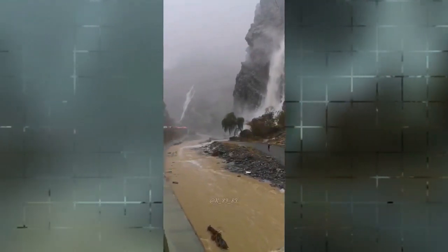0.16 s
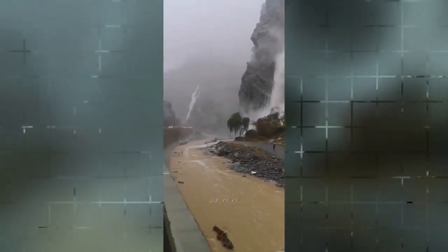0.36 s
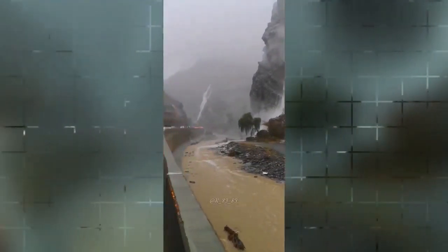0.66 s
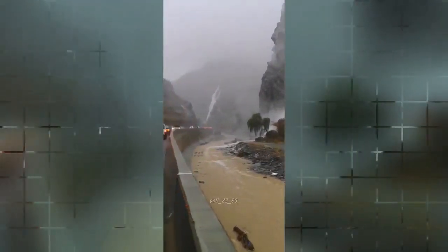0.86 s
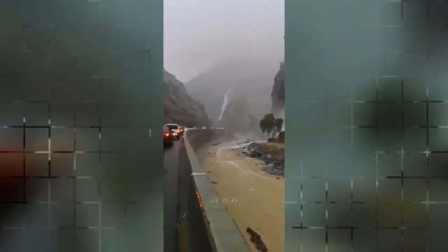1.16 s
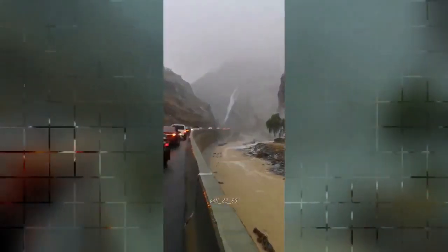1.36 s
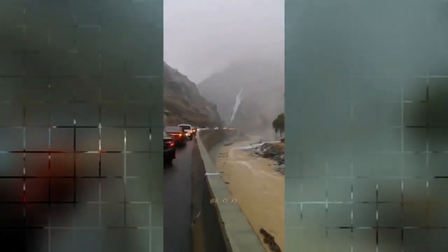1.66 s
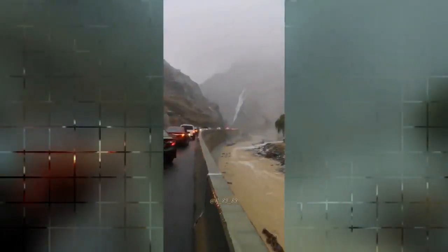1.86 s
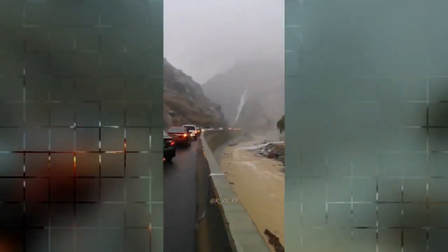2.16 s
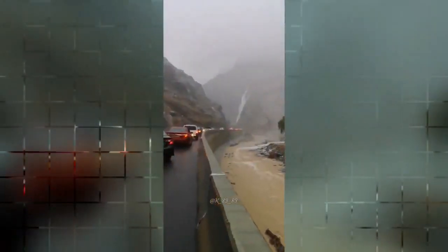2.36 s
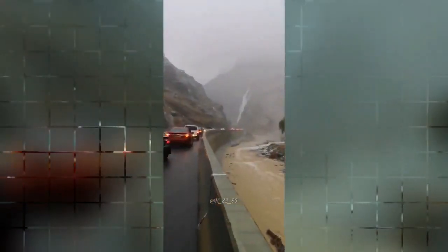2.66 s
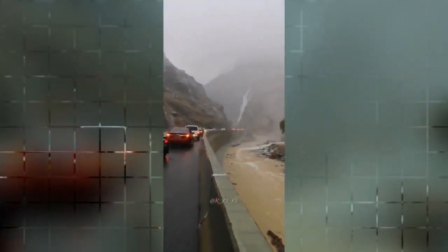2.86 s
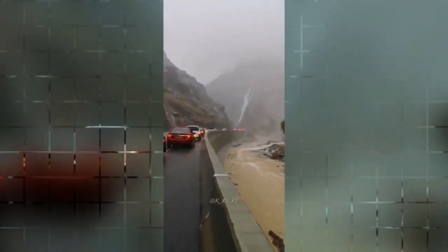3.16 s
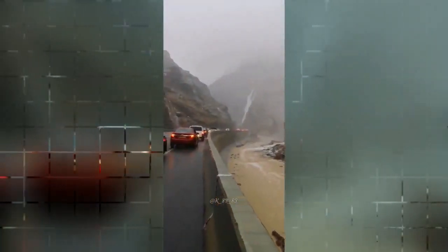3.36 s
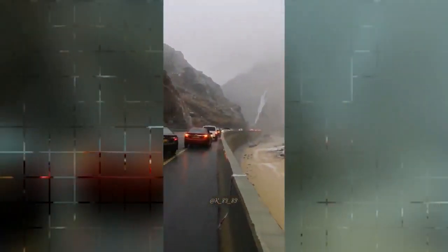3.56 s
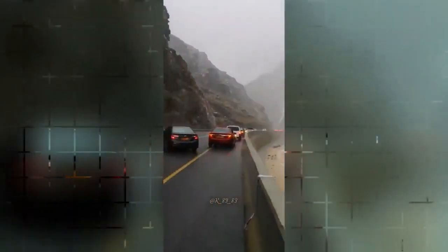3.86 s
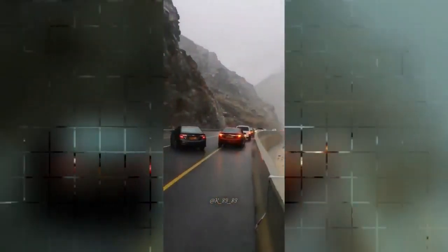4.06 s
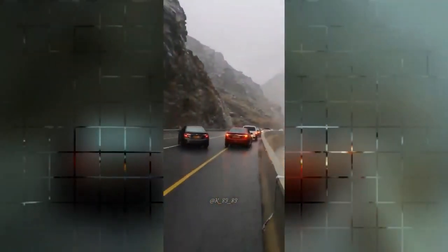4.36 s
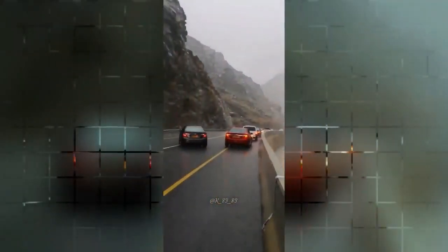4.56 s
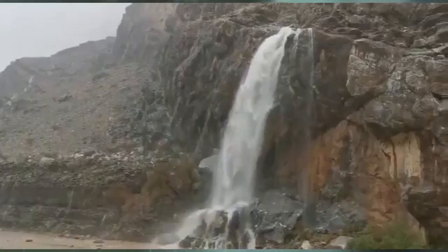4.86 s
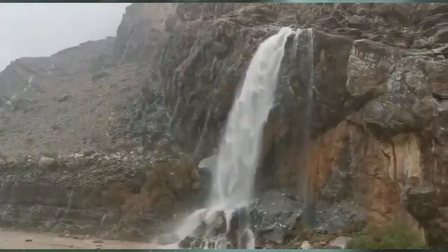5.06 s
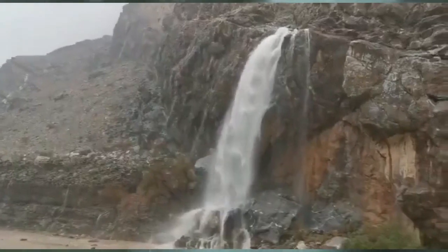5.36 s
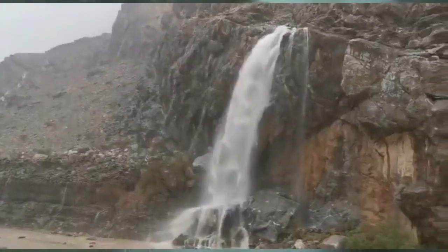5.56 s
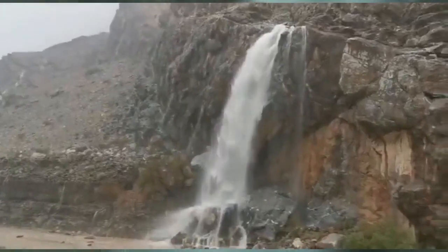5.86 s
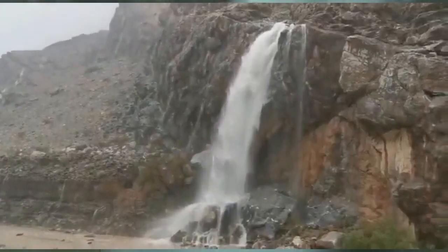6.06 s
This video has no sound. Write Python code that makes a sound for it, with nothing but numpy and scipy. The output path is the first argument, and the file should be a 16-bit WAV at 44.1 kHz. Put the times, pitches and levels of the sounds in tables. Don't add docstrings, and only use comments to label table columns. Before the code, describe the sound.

Heavy rain hisses over a mountain road beside a rumbling flood, with wind buffeting and hard drop slaps, then silence and a waterfall's roar.

```python
import sys
import numpy as np
from scipy import signal
from scipy.fft import rfft, irfft
from scipy.io import wavfile
from scipy.ndimage import uniform_filter1d

SR = 44100
rng = np.random.default_rng(int(sys.argv[2]) if len(sys.argv) > 2 else 0)


def generate_wav(sig):
    pcm = np.round(np.clip(np.atleast_2d(sig).T, -1, 1) * 32767).astype(np.int16)
    wavfile.write(sys.argv[1], SR, pcm)


def volts(x):
    e = np.asarray(x, float) / 20
    return 10 ** e


N = 273720
FRAME_START = 208
TOP_HZ = 16050


def rms_one(x):
    return x / np.sqrt(np.mean(x ** 2) + 1e-20)


def in_time(rows):
    s, *columns = np.transpose(rows)
    return [np.interp(np.arange(N) / SR, s, c) for c in columns]


def at_hz(points, hz):
    table_hz, value = np.array(points)[:, 0], np.array(points)[:, 1]
    return np.interp(np.log(hz), np.log(table_hz), value)


def follow(level_db, share, curve_db):
    return level_db + share * (curve_db - curve_db.mean())


def drift(rate):
    r = np.exp(-80 * np.pi * rate / SR)
    noise = rng.standard_normal(N // 40 + 2002)
    slow = signal.lfilter([1], [1, -2 * r, r * r], noise)[2000:]
    return np.interp(np.arange(N) / 40, np.arange(len(slow)), rms_one(slow))


def ring(clicks, hz, t60):
    r, w = volts(-60 / (t60 * SR)), 2 * np.pi * hz / SR
    return signal.lfilter([0, np.sin(w)], [1, -2 * r * np.cos(w), r * r], clicks + 1e-18)


def burst(hz, t60, size=2048):
    swing = ring(ring(np.eye(1, size)[0], hz, t60), hz, t60)
    return swing / np.abs(swing).max()


def grains(per_s, spread_db):
    sizes = volts(spread_db * np.minimum(rng.exponential(1, (2, N)), 5)) * rng.choice([-1, 1], (2, N))
    return rms_one(sizes * (rng.random((2, N)) < per_s / SR))


def bands(source, colour, low_hz, high_hz, patchy_db, rate, stereo=True):
    # frequency in Hz, left-right correlation.
    likeness = [(25, 0.99), (60, 1), (130, 0.98), (260, 0.94), (400, 0.34), (700, 0.004), (1250, 0.43),
                (1750, 0.42), (2400, -0.51), (3400, 0.2), (6000, 0.093), (8000, 0.29), (9300, 0.58),
                (12000, 0.14)]
    # frequency in Hz, left minus right in dB.
    ports = [(300, 0), (700, -2), (1100, -0.4), (1800, -2.5), (2600, 3), (3400, 0.2), (5200, 3),
             (6100, 4.5), (7750, 10), (8700, 6.5), (9800, 1)]
    hz = np.maximum(np.fft.rfftfreq(N, 1 / SR), 1)
    mid, side = rfft(source) * volts(at_hz(colour, hz))
    alike = np.clip(at_hz(likeness, hz), -1, 1) if stereo else 1
    tilt = volts(at_hz(ports, hz) / 2 * np.array([[1], [-1]])) if stereo else 1
    pair = tilt * (np.sqrt(1 + alike) * mid + np.sqrt(1 - alike) * side * [[1], [-1]])
    out, together = 0, drift(rate / 4)
    for centre in np.arange(np.log2(low_hz), np.log2(high_hz), .5):
        window = np.cos(np.pi * np.clip(np.log2(hz) - centre, -.5, .5))
        flicker = volts(patchy_db * (0.29 * together + drift(rate)))
        out = out + flicker * irfft(pair * window, N)
    return out / np.sqrt(np.mean(out.mean(axis=0) ** 2))


def evened(x, share):
    even_s = 0.047
    level = np.sqrt(uniform_filter1d(x.mean(axis=0) ** 2, int(even_s * SR)) + 0.024)
    return rms_one(x / level ** np.clip(share, 0, 1))


def gusty(wind_db, gusts, length_s):
    t = np.arange(N) / SR
    gust_power = sum(volts(2 * db) * np.exp(-((t - s) / length_s) ** 2) for s, db in gusts)
    return 10 * np.log10(volts(2 * wind_db) + gust_power)


def gulps():
    # start in seconds, level in dB, pitch in Hz.
    bubbles = [
        (5.191, -25, 330),
        (5.398, -24, 250),
        (5.751, -24, 206),
        (5.83, -24.5, 322),
    ]
    out = np.zeros(N)
    for s, level_db, hz in bubbles:
        start = round(s * SR)
        out[start:start + 4096] += volts(level_db) * burst(hz, 5.5 / hz, size=4096)
    return out


def waterfall():
    # frequency in Hz, density in dB per Hz.
    fall_colour = [(12, -11), (30, 3), (98, -2.5), (240, -9), (420, -21), (620, -18), (1240, -25),
                   (1850, -20.5), (2180, -18.5), (2450, -19), (2750, -25), (3500, -23), (4400, -24),
                   (5200, -22), (7000, -27), (7850, -37.5), (9000, -28.5), (10900, -24), (13400, -33.5)]
    # time in seconds, wind in dB, plunge in dB.
    fall_levels = [(5.12, -28.5, -38.5), (5.24, -29.5, -39), (5.33, -30.5, -39), (5.5, -23, -38),
                   (5.64, -29, -40), (5.8, -30.5, -38.5), (6.07, -31, -37), (6.2, -35.5, -35.5)]
    # time in seconds, peak in dB.
    fall_gusts = [(5.13, -27.5), (5.2, -27), (5.3, -23.5), (5.336, -29), (5.44, -27), (5.51, -38),
                  (5.58, -40), (5.65, -25.5), (5.76, -27.5), (5.83, -26), (5.89, -34), (6.01, -34),
                  (6.17, -31)]
    lull_db, gust_s = -8, 0.009
    pool_db, mist_mean_db, churn_db = -43.5, -44.5, -33.5

    wind_db, spray_db = in_time(fall_levels)
    plunge = spray_db - spray_db[-SR:].mean()
    gust = wind_db - wind_db[-SR:].mean()
    roar_db = pool_db + 0.73 * plunge + 0.25 * gust
    mist_db = mist_mean_db + 0.73 * plunge
    water = rng.standard_normal((2, N)) + 0.39 * grains(per_s=900, spread_db=2.0)

    def part(low_hz, high_hz, patchy_db, rate):
        return bands(water, fall_colour, low_hz, high_hz, patchy_db, rate, stereo=False)

    gust_db = gusty(wind_db + lull_db, fall_gusts, gust_s)
    wind = volts(gust_db) * evened(part(16.1, 100, patchy_db=3.0, rate=20.0), .6)
    churn = evened(part(127.0, 370, patchy_db=3.5, rate=20.0), .3)
    wind = wind + volts(churn_db + gust + 0.27 * (gust_db - wind_db)) * churn
    roar = volts(roar_db) * part(466, 1100, patchy_db=3.0, rate=12.0)
    spray = volts(spray_db) * part(1235, 6000, patchy_db=1.35, rate=11.0)
    mist = volts(mist_db) * part(6720, 17000, patchy_db=1.5, rate=5.4)
    return (wind + roar + spray + mist)[0] + gulps()


def rumble():
    # frequency in Hz, density in dB per Hz.
    rumble_colour = [(8.8, -54), (15, -11), (46, 1), (64, -2.5), (110, -7.5), (150, -11.5), (232, -19.5),
                     (269, -23), (409, -30.5), (480, -46.5), (620, -75.5), (1060, -120)]
    # time in seconds, level in dB.
    mean_wind = [(0.0, -27.5), (0.38, -30.5), (0.6, -26), (1.5, -21), (2.0, -22), (2.5, -27.5), (3.3, -32),
                 (3.95, -32), (4.3, -34), (4.7, -35.5)]
    # time in seconds, peak in dB.
    road_gusts = [(0.0, -24.5), (.08, -22), (0.482, -13), (.58, -14), (.78, -26), (1.08, -14.5),
                  (1.3, -20.5), (1.55, -15), (1.68, -16), (1.96, -9.5), (2.019, -15), (2.13, -24),
                  (2.28, -23), (2.62, -30), (2.97, -28), (3.15, -25.5), (3.489, -17), (3.88, -27),
                  (4.12, -20.5), (4.24, -23.5)]
    # time in seconds, level in dB.
    surge = [(0.0, -30), (0.05, -29.5), (0.29, -31.5), (0.54, -28.5), (0.73, -30.5), (1.39, -29.5),
             (1.71, -30.5), (1.98, -27.5), (2.13, -33.5), (2.16, -31), (3.36, -35), (3.49, -29),
             (3.53, -38), (3.76, -34), (3.82, -31.5), (4.03, -36), (4.58, -34), (4.7, -34)]
    roar_db, roar_gusts = 3, 0.11

    (wind_db,), (flood_db,) = in_time(mean_wind), in_time(surge)
    gust_db = gusty(wind_db, road_gusts, length_s=0.015)
    air = rng.standard_normal((2, N))
    lumps = evened(bands(air, rumble_colour, 16, 75, patchy_db=-0.3, rate=39.0), 0.6)
    roar = evened(bands(air, rumble_colour, 93.7, 380, patchy_db=-1.84, rate=11.0), 0.19)
    return volts(gust_db) * lumps + volts(roar_db + flood_db + roar_gusts * (gust_db - wind_db)) * roar


def rain():
    # time in seconds, level in dB.
    downpour = [(0.0, -39.5), (1.13, -40), (1.6, -41.5), (2.39, -40), (2.9, -40), (3.1, -39), (3.48, -40),
                (4.4, -38.5)]
    # frequency in Hz, density in dB per Hz.
    rain_colour = [(260, -30), (450, -1.5), (537, -7), (848, -5.5), (1000, -4), (1200, -4.5), (1640, -3),
                   (2140, -1.5), (2750, -4), (3290, -9), (4500, -11), (5200, -11.5), (6190, -10.5),
                   (7200, -11.5), (7830, -8), (10100, -17.5), (11800, -17.5), (14300, -22.5), (15200, -19)]
    patter_db, = in_time(downpour)
    sizzle_db = follow(-38.5, 1.2, patter_db)
    fall = rng.standard_normal((2, N)) + .45 * grains(per_s=1400, spread_db=2.5)
    patter = volts(patter_db + 2.0) * bands(fall, rain_colour, 519, 3000, patchy_db=1.5, rate=13.0)
    sizzle = volts(sizzle_db) * bands(fall, rain_colour, 4160, 17000, patchy_db=1.34, rate=33.0)
    return patter + sizzle


def slap(contact_hz, size=2048):
    # frequency in Hz, width in Hz, lift in dB.
    shell = [(1070, 300, -2), (2080, 430, 2)]
    vent_hz = 220
    contact = signal.butter(3, contact_hz, fs=SR, output="sos")
    vent = signal.butter(2, vent_hz, "high", fs=SR, output="sos")
    swing = signal.sosfilt(vent, signal.sosfilt(contact, np.eye(1, size)[0]))
    for hz, width_hz, lift_db in shell:
        r = np.exp(-np.pi * width_hz / SR)
        zeros = (1 - r * r) / 2 * np.array([1, 0, -1])
        poles = [1, -2 * r * np.cos(2 * np.pi * hz / SR), r * r]
        swing = swing + volts(lift_db) * signal.lfilter(zeros, poles, swing)
    return swing / np.abs(swing).max()


def drops():
    # start in seconds, slap in dB, contact sharpness in Hz,
    # thud in dB, tick in dB.
    left_drops = [(0.94203, -30, 720, -7.5, -30), (1.2210, -28, 1200, -24, -26),
                  (1.4153, -30, 5000, -38, -16), (1.47805, 1, 1600, -13, -11.5),
                  (1.71470, 4, 5800, -22, -16), (1.98001, -4.5, 6500, -28, -19),
                  (1.9805, -17, 3000, -34, -30), (1.9819, -17, 2500, -34, -30),
                  (2.38552, -21, 700, -11.5, -30), (2.73833, -0.4, 1900, -3.6, -23),
                  (2.9819, -32, 900, -27, -32), (3.6509, -30, 1200, -25, -28),
                  (3.76297, -16, 5500, -30, -6.5)]
    right_drops = [(0.455, -29, 1290, -37, -23), (2.271, -16, 1500, -35, -48),
                   (2.721, -18.5, 1500, -40, -41), (3.336, -18, 1300, -36, -26),
                   (3.523, -26, 1200, -28, -54.5), (3.5325, -16, 2000, -38, -34)]
    far_slap_db = [-3.3, -2]
    far_thud_db = -2.9
    body_hit_db = 5.9
    thud_reach = 1.22
    snap_db, knock_db = -22, -5.5
    shadow_hz, port_lag_s = 550, 0.00058
    slap_delay, tick_delay, thud_lag, knock_delay = [round(s * SR) for s in (.00033, .00043, .00005, .00073)]

    thud = ring(np.eye(1, 2048)[0], 395, t60=0.025)
    thud = thud + volts(knock_db) * ring(np.eye(1, 2048, knock_delay)[0], 940, t60=0.0105)
    tick = np.roll(burst(7660, t60=0.0009), tick_delay)
    snap = np.roll(burst(10800, t60=0.0006), tick_delay)
    shadow, lag = signal.butter(1, shadow_hz, fs=SR), round(port_lag_s * SR)
    out = np.zeros((2, N))
    for near, port_drops in enumerate([left_drops, right_drops]):
        for s, slap_db, contact_hz, thud_db, tick_db in port_drops:
            push = np.sign(slap_db - thud_db - body_hit_db)
            sharp = push * volts(slap_db) * np.roll(slap(contact_hz), slap_delay)
            sharp = sharp + volts(tick_db) * tick + volts(slap_db + snap_db) * snap
            dulling = signal.butter(2, thud_reach * contact_hz, fs=SR)
            body = -push * volts(thud_db) * signal.lfilter(*dulling, thud)
            crossing = volts(far_slap_db[near]) * sharp + volts(far_thud_db) * np.roll(body, thud_lag)
            far = signal.lfilter(*shadow, crossing)
            at = round(s * SR)
            out[near, at:at + len(far)] += sharp + body
            out[1 - near, at + lag:at + lag + len(far)] += far
    return out


def limited(x):
    limit_db, release_db_s, squeeze = -13, 21, 0.19
    ramp = release_db_s * np.arange(N) / SR
    peak_db = 20 * np.log10(np.abs(x).max(axis=0) + 1e-9)
    over = squeeze * np.maximum(peak_db - limit_db, 0)
    held = np.maximum.accumulate(over + ramp) - ramp
    return x * volts(-uniform_filter1d(held, size=400, origin=-150))


def starved(x, steps, wander_db, cut_hz, strain=(), size=1024):
    n, k = np.arange(2 * size) + .5, np.arange(size) + .5
    window = np.sin(np.pi * n / size / 2)[:, None]
    basis = window * np.cos(np.pi / size * np.outer(n + size / 2, k)) * np.sqrt(2 / size)
    early = size - FRAME_START
    halves = np.pad(x, (size + early, 2 * size - (N + early) % size)).reshape(-1, size)
    lines = np.hstack([halves[:-1], halves[1:]]) @ basis
    hz = k * SR / size / 2
    chance = rng.standard_normal((len(lines) // 2 + 1, size // 32))
    wander = np.kron(chance, np.ones((2, 32)))[:len(lines)]
    wander = .9 * wander + .7 * uniform_filter1d(wander, size=96, axis=1)
    t = (np.arange(len(lines))[:, None] * size - early) / SR
    strain_db = sum(db * np.exp(-((t - s) / length) ** 2) for s, db, length in strain)
    step = volts(at_hz(steps, hz) + wander_db * wander + strain_db)
    kept = np.sign(lines) * np.floor(np.abs(lines) / step + .4) * step * (hz < cut_hz)
    frames = kept @ basis.T
    return (frames[:-1, size:] + frames[1:, :size]).ravel()[early:early + N]


def scene():
    # frequency in Hz, step in dB.
    road_step = [(500, -55), (4000, -50), (9000, -46), (10000, -35), (12000, -36.5), (13500, -38.5),
                 (15000, -42)]
    road_side_step = [(500, -55), (4000, -50), (9100, -46), (9200, -24), (12000, -31), (15000, -37)]
    fall_step = [(500, -55), (6000, -46), (6900, -38.5), (7600, -35.5), (8800, -34), (9400, -44),
                 (13500, -46)]
    fuzz_step = [(500, -58), (20000, -58)]
    # time in seconds, extra step in dB, length in seconds.
    road_strain = [(0.6, 4.5, .03), (1.05, 3, .04), (1.4, 6.5, .03), (1.88, 6, .04), (2.07, 3.5, .05),
                   (2.7, 3, .04), (3.65, 1.5, .04), (4.02, 3, .03), (4.52, 5, .05)]
    fall_strain = [(5.2, -6, 0.14), (5.48, 4, 0.13), (5.63, -5, .02), (5.7, 2, 0.045), (5.79, -5, .03),
                   (5.87, 4, .04), (5.93, -10, .025), (6.05, 1, .06)]
    road_end_s, fall_start_s = 4.7176, 5.1122

    t = np.arange(N) / SR
    left, right = limited(rumble() + rain() + drops())
    mid = starved((left + right) / 2, road_step, wander_db=5, cut_hz=15120, strain=road_strain)
    side = starved((left - right) / 2, road_side_step, wander_db=7, cut_hz=15120, strain=road_strain)
    road = (mid + side * [[1], [-1]]) * np.clip((road_end_s - t) / 0.00027, 0, 1)

    fall = starved(waterfall(), fall_step, wander_db=3, cut_hz=13600, strain=fall_strain)
    fuzz_band = signal.cheby2(8, 50, [14000, 15400], "band", fs=SR, output="sos")
    fuzz = volts(-63.5 + 4.0 * drift(14.0)) * signal.sosfilt(fuzz_band, rng.standard_normal(N))
    fuzz = starved(fuzz, fuzz_step, wander_db=3.5, cut_hz=TOP_HZ)
    residue_band = signal.cheby2(6, 40, [6300, 10000], "band", fs=SR, output="sos")
    residue = volts(-57.0) * signal.sosfilt(residue_band, rng.standard_normal(N))
    return road + (fall + residue + fuzz) * np.clip((t - fall_start_s) / 0.0014, 0, 1)


def roll_off(x):
    return signal.sosfilt(signal.butter(12, 15780, fs=SR, output="sos"), x)


def record(dry):
    ceiling = 1.05
    rounded = dry / (1 + (dry / ceiling) ** 6) ** (1 / 6)
    mix = signal.sosfilt(signal.cheby2(12, 60, TOP_HZ, fs=SR, output="sos"), rounded)
    return roll_off(mix)


dry = scene()
out = record(dry)
generate_wav(out)
```